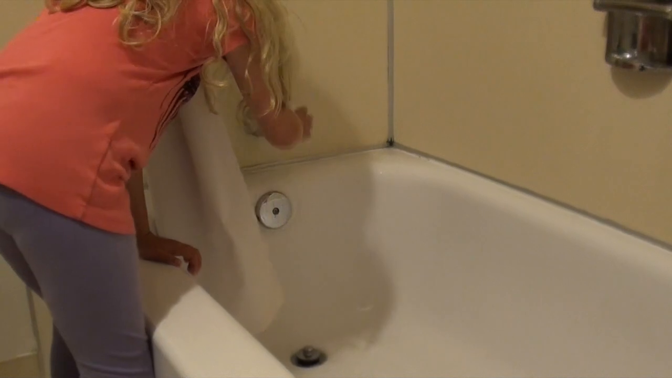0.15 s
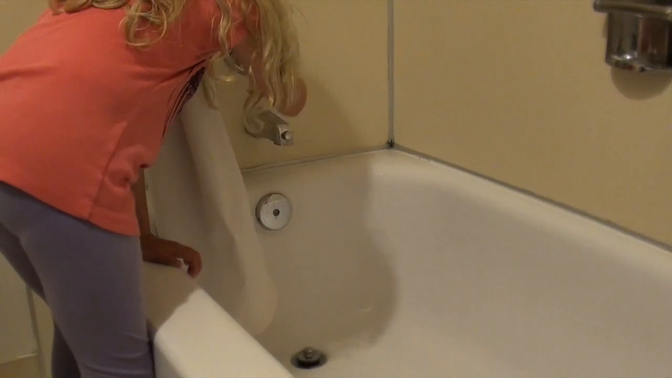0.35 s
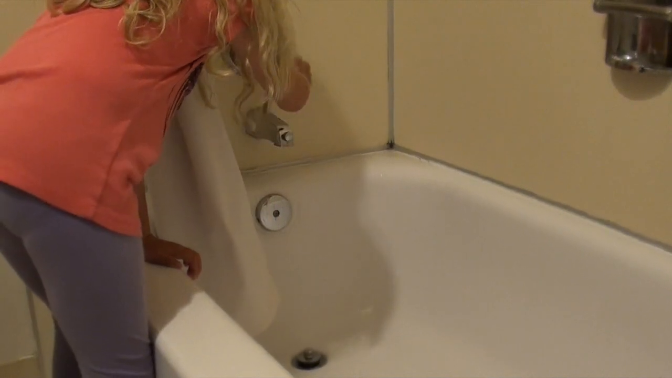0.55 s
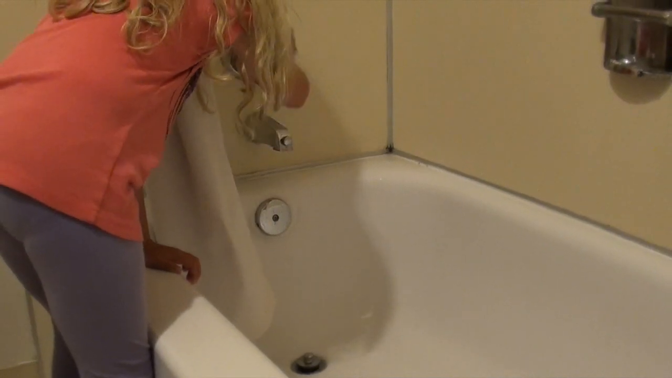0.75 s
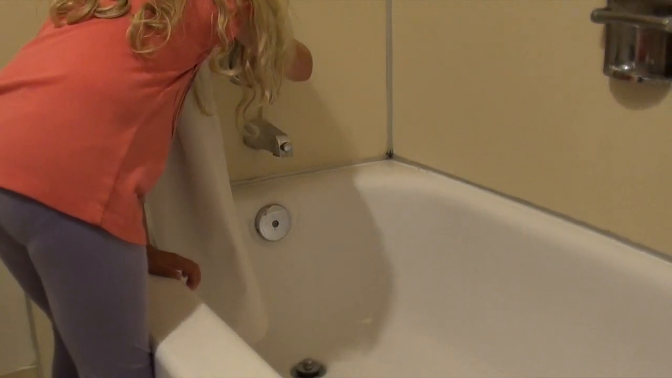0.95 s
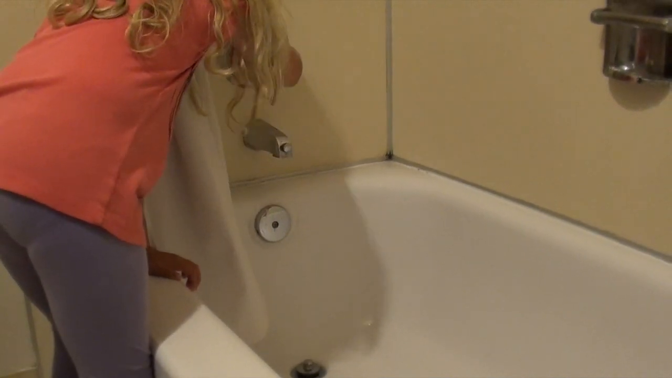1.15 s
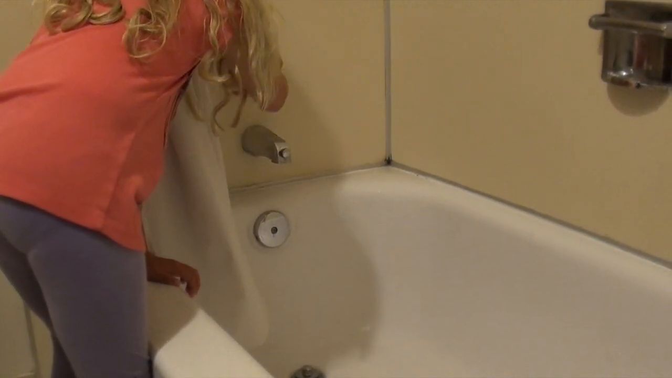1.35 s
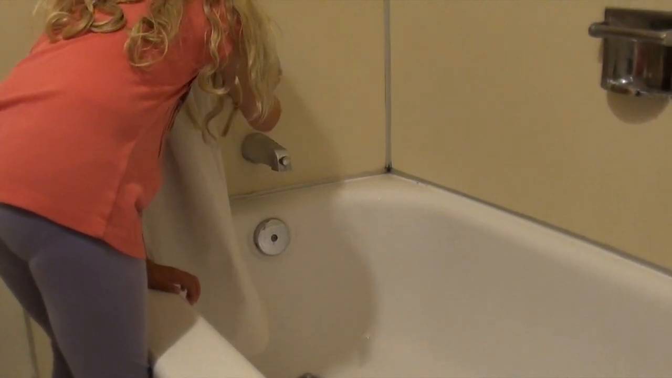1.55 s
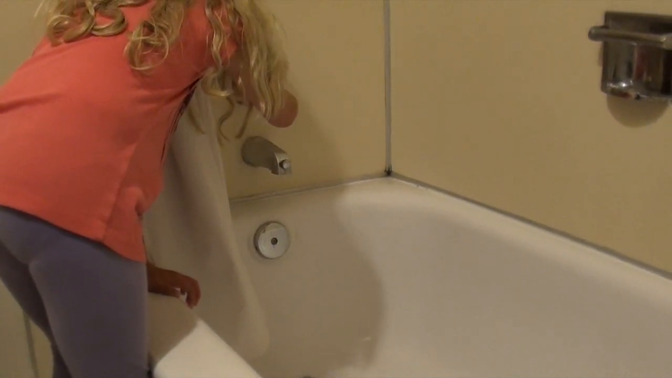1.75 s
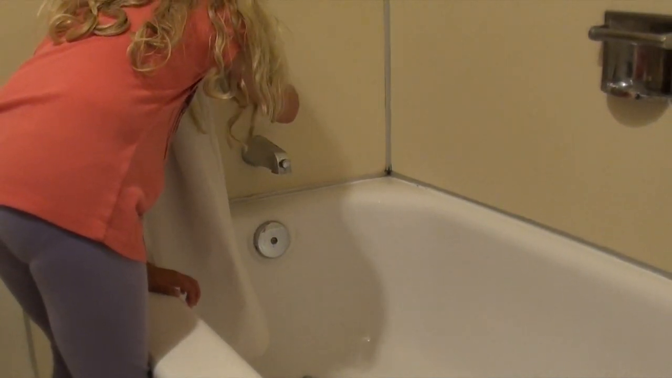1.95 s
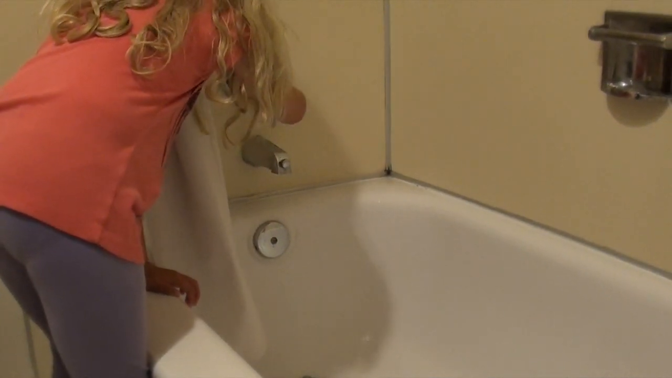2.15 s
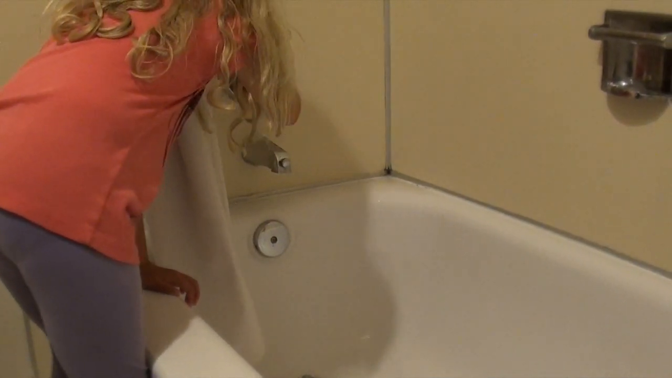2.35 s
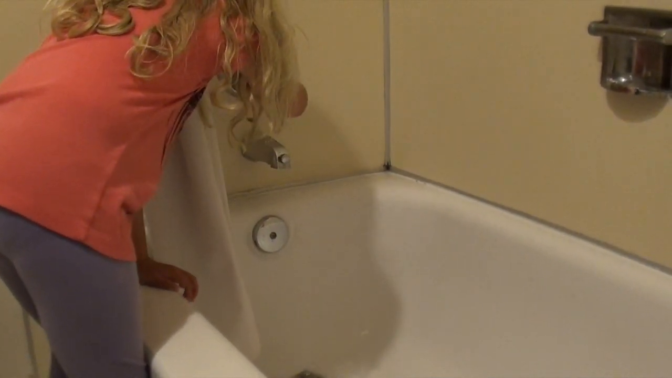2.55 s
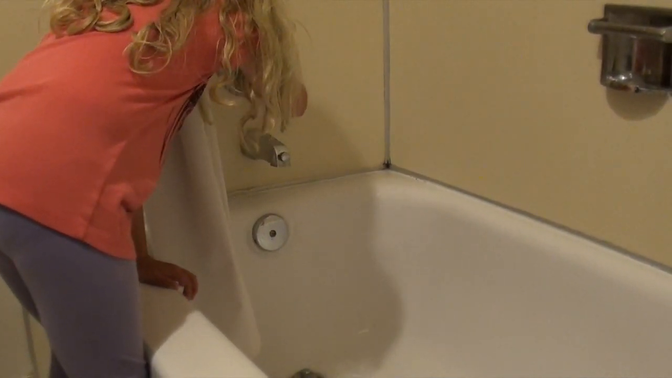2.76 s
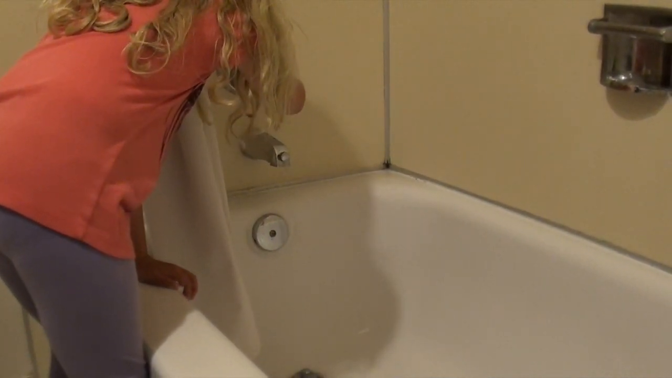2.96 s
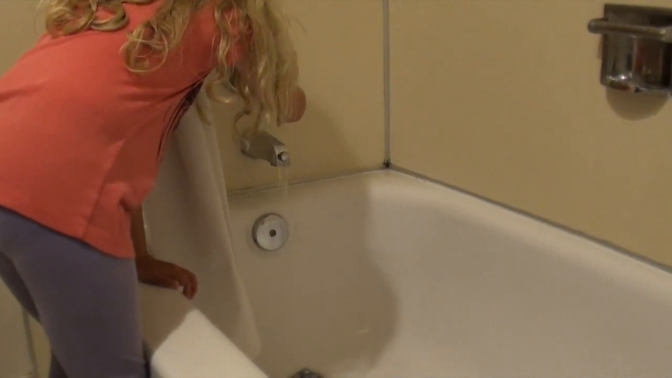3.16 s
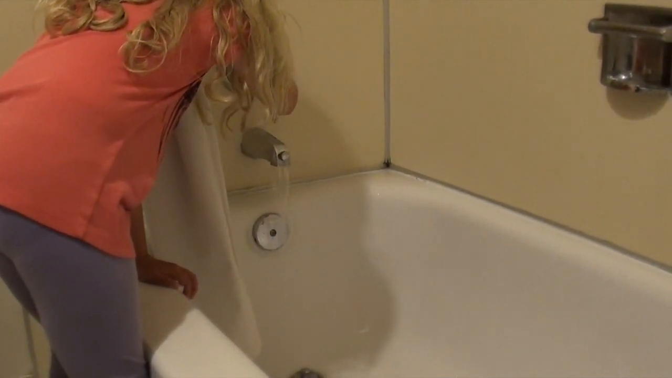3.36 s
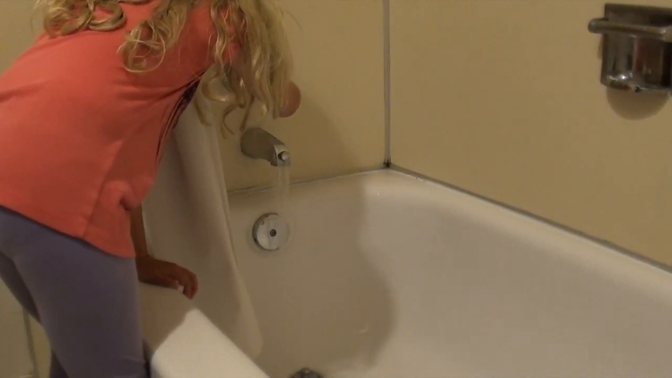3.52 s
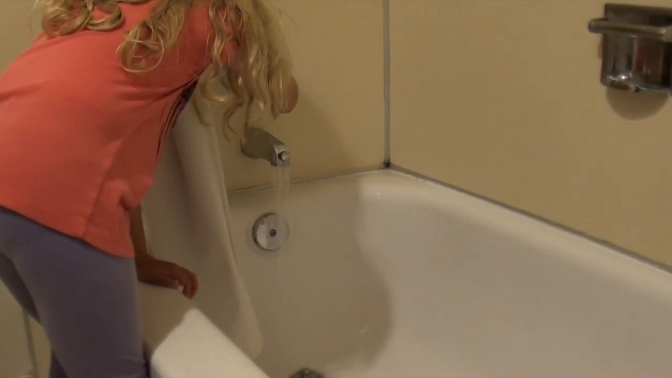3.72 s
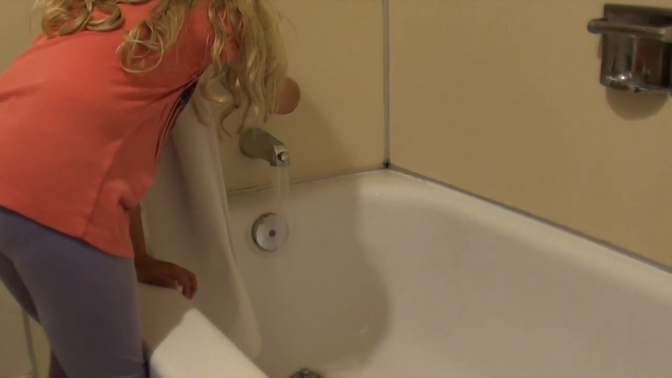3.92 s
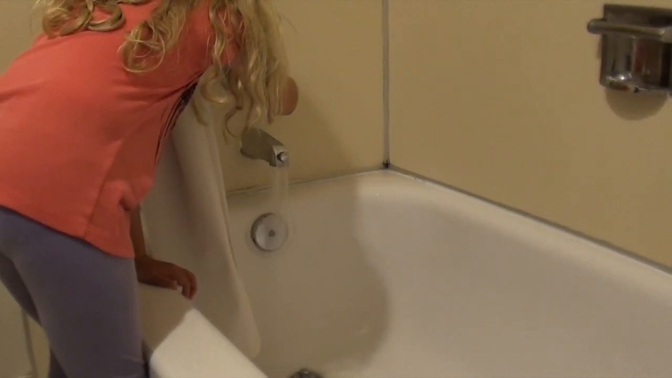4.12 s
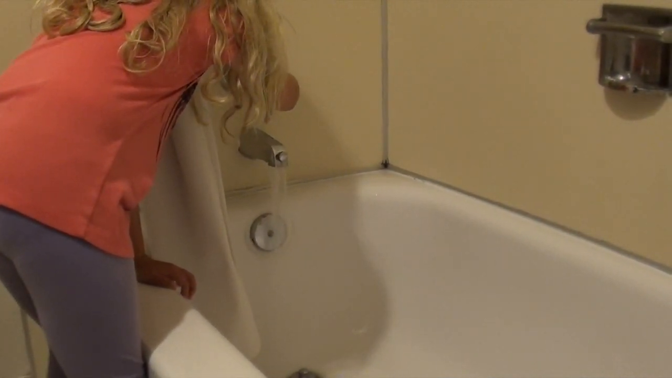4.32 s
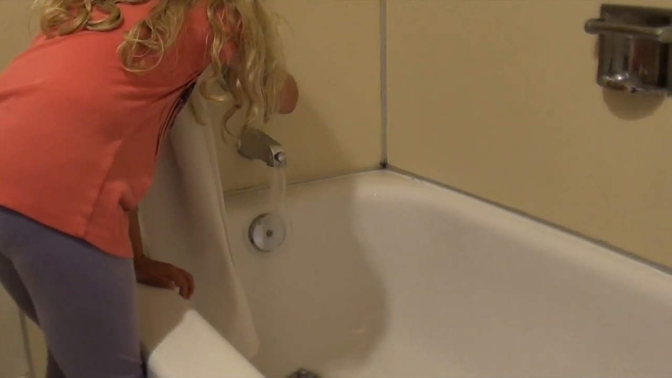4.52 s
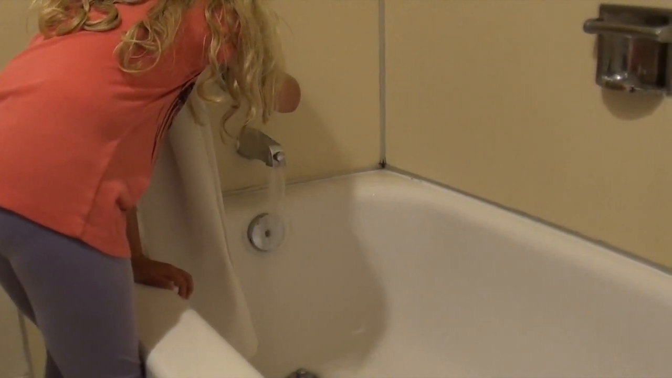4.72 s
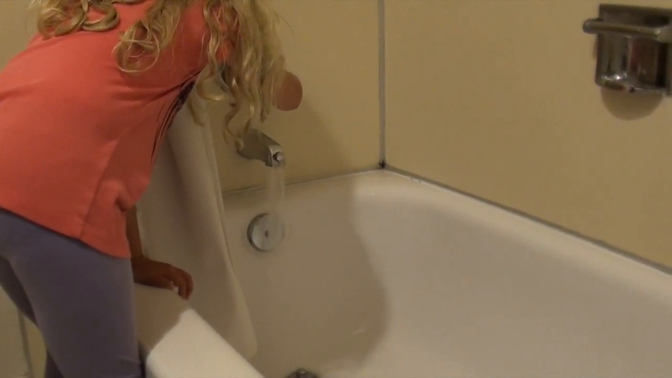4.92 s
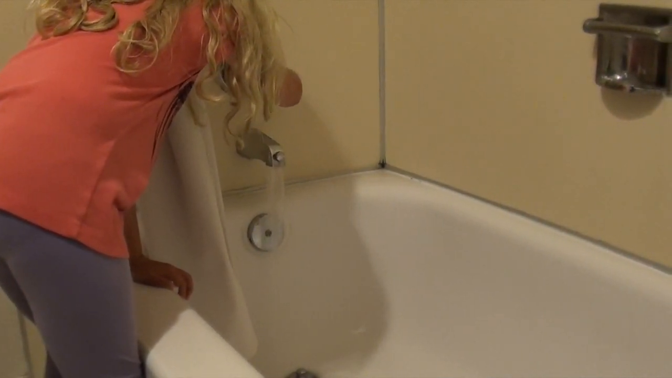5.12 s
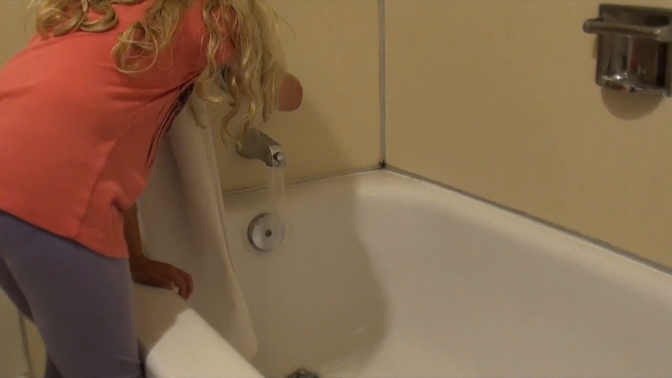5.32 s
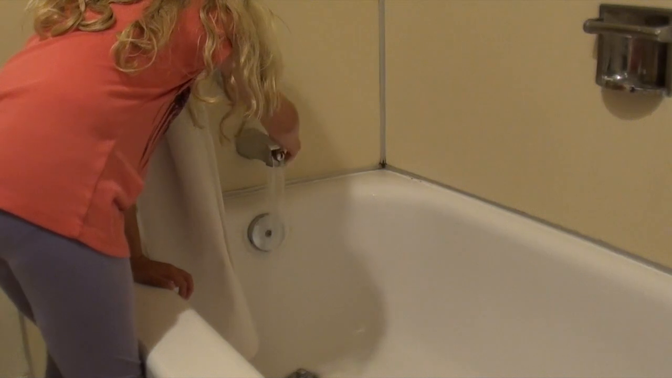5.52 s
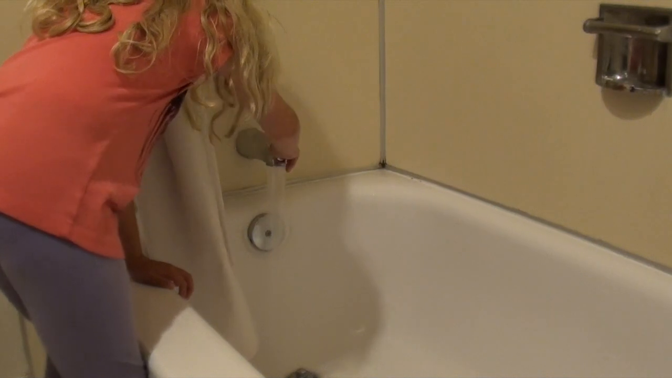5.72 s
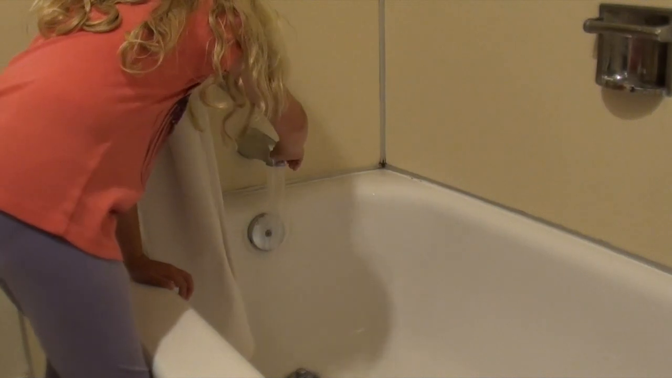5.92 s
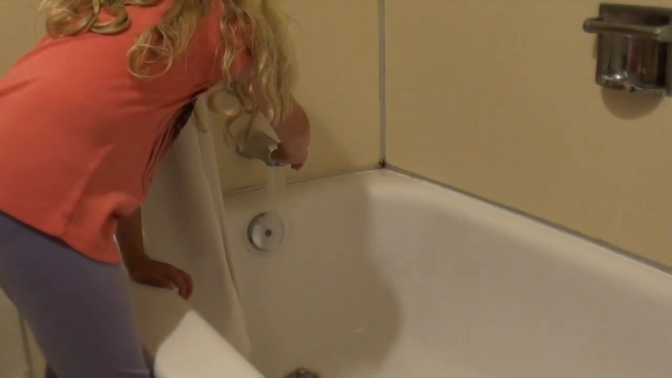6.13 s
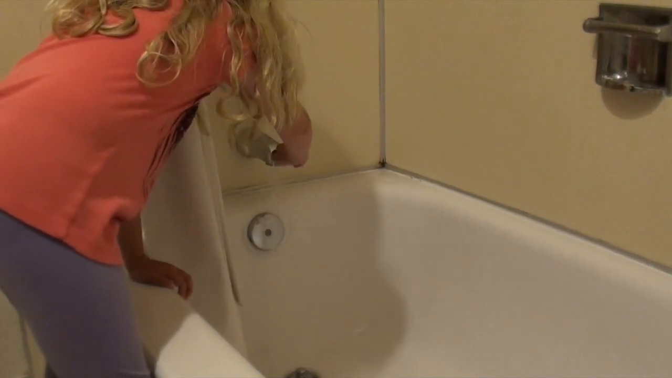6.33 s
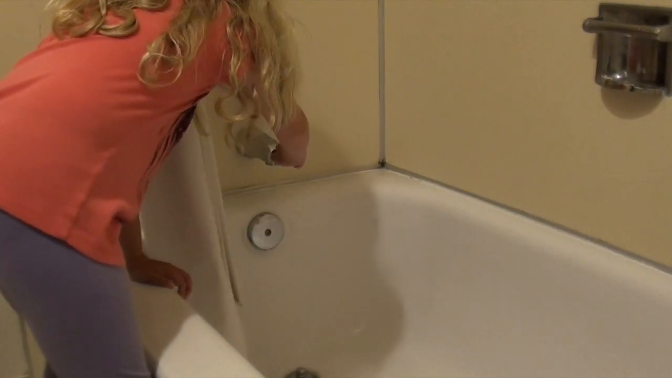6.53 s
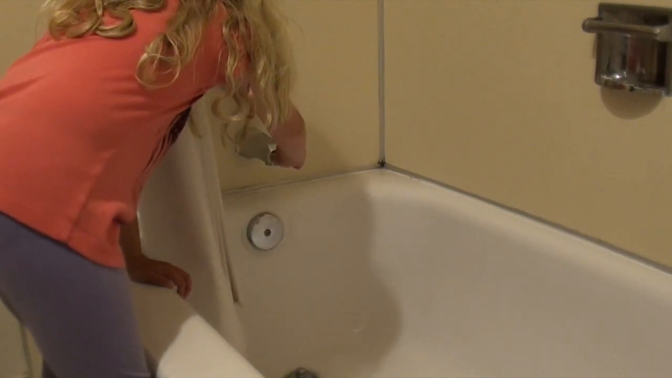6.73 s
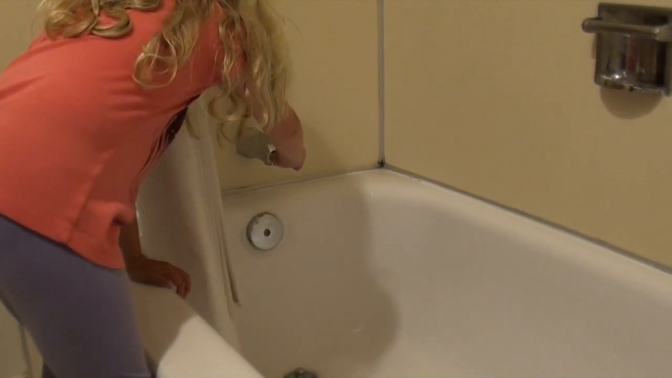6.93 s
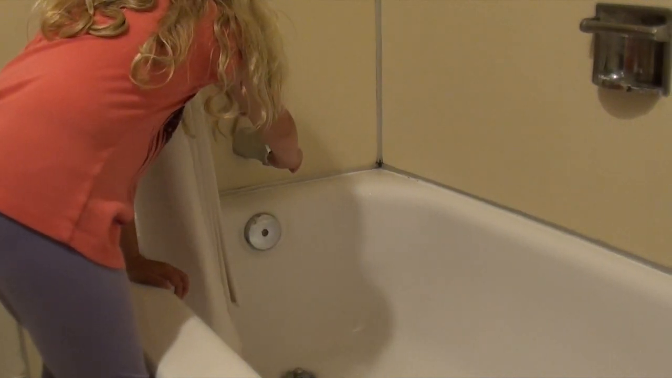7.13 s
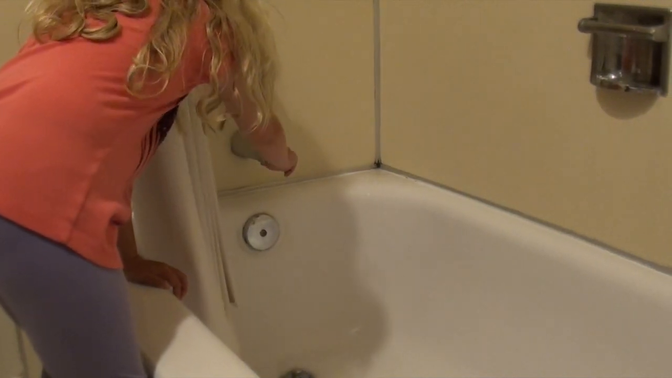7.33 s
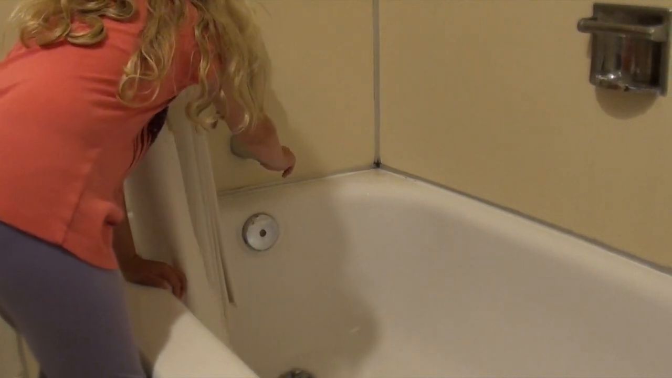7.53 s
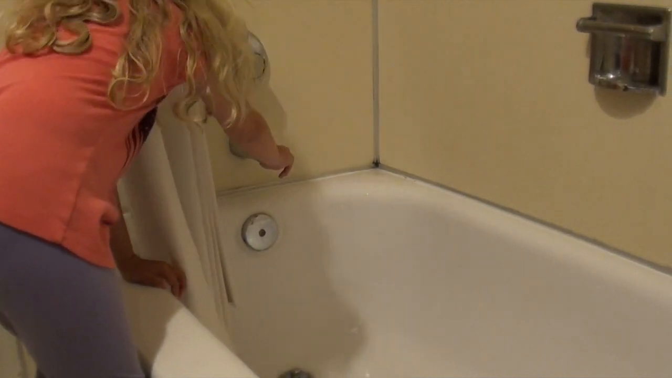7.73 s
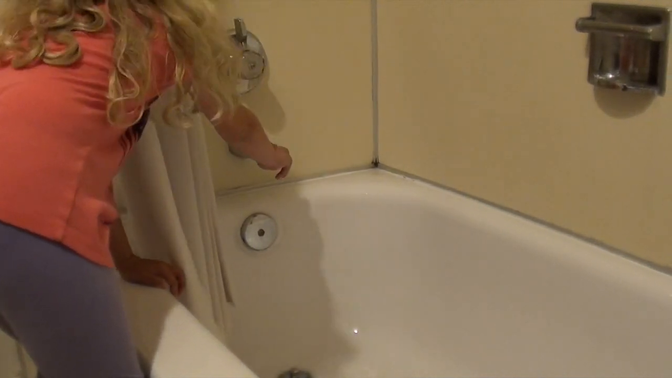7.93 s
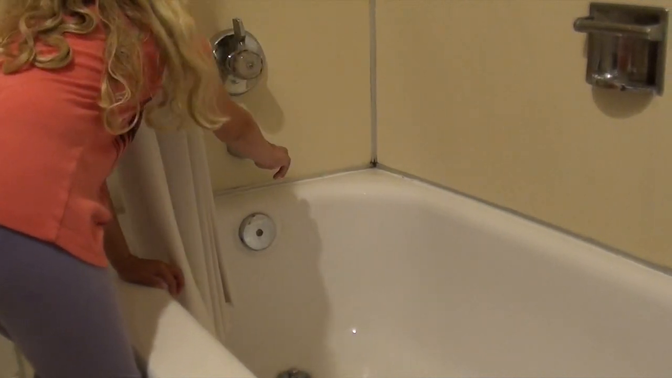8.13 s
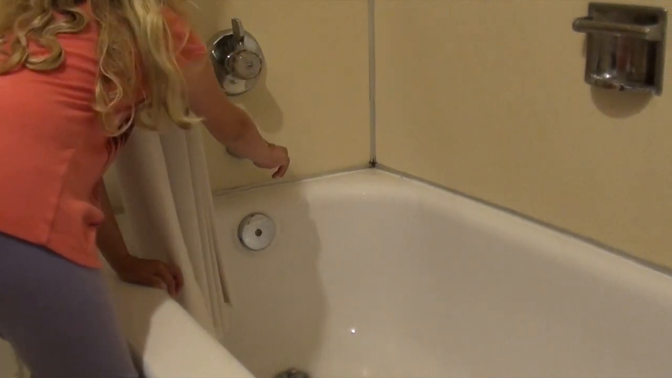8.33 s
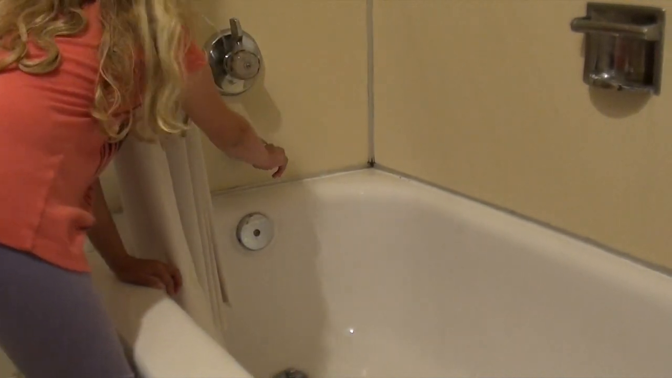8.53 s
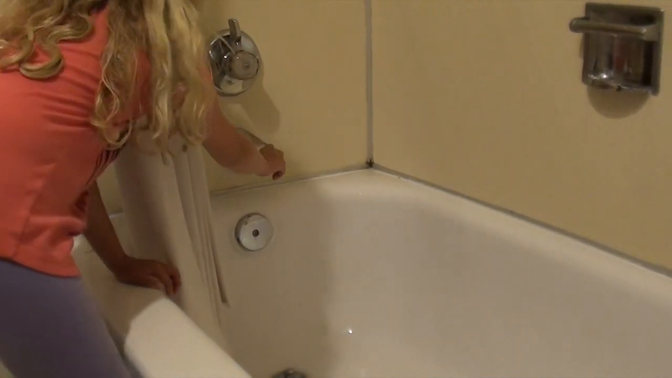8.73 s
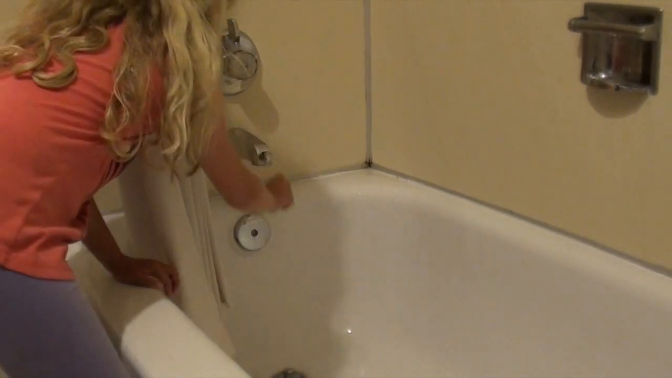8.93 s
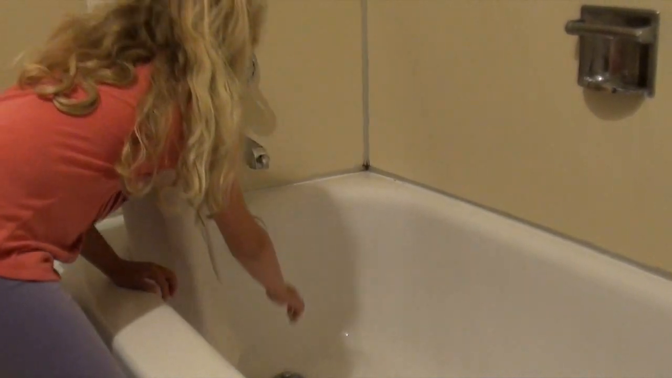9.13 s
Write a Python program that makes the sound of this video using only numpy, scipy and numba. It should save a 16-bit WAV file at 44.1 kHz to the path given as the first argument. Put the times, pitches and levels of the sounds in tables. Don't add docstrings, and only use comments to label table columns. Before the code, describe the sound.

Over a bathroom fan's hum, a stiff tap squeaks open, water hisses and gurgles into an empty tub, then a diverter thunks and a shower sprays.

```python
import sys
import numpy as np
from scipy import signal
from scipy.fft import rfft, irfft, next_fast_len
from scipy.io import wavfile
from scipy.ndimage import uniform_filter1d
from numba import njit

SR = 44100
rng = np.random.default_rng(int(sys.argv[2]) if len(sys.argv) > 2 else 0)


def volts_from_decibels(level):
    exponent = np.asarray(level, float) / 20
    return 10 ** exponent


def log_audio(samples):
    frames = np.atleast_2d(samples).T
    limited = np.clip(frames, -1, 1)
    pcm = np.round(limited * 32767).astype(np.int16)
    wavfile.write(sys.argv[1], SR, pcm)


N = 404397

# frequency in Hz, level in dB per Hz.
JET_SPECTRUM = [(2900, -17.5), (3400, -21), (4500, -20), (5600, -22), (7400, -5), (8700, 0.5),
                (10000, -6.5), (10900, -14), (11600, -16), (12400, -21), (13100, -16.5), (13600, -29),
                (15700, -47)]
# time in seconds, level in dB.
JET_LEVEL = [(2.63, -44), (2.71, -32.5), (2.96, -33.5), (3.08, -22), (3.34, -22), (3.38, -26), (3.55, -24),
             (3.63, -21.5), (4.04, -24), (4.58, -24), (5.7, -23), (6.46, -25), (6.53, -22.5), (6.63, -28.5),
             (7.39, -29.5), (7.48, -36), (7.49, -37)]
# peak time in seconds, lift in dB.
SURGES = [(3.19, 1.5), (3.44, 6.5), (3.6, -2), (3.74, 1), (4.11, -2), (4.5, 2), (4.82, 3), (5.19, 0),
          (5.71, -2), (5.82, 3), (6.07, 1.5), (6.24, 3.5), (6.32, 5.5), (6.39, 3)]
SURGE_RISE_FALL_DB_S = 101, 80
# frequency in Hz, width in Hz, level in dB.
SPOUT_MODES = [(7160, 210, 7.5), (6800, 3300, 3.5), (7500, 1040, 10.5)]
SPOUT_WETS_S, RING_DRY_DB, RING_WET_DB, RING_DIVERTED_DB = (3.04, 4.26), -15.5, 0.5, -6.5
# frequency in Hz, width in Hz, level in dB.
RISER_MODES = [(2190, 72, -9.5), (3900, 91, -10.5), (5000, 67, -11), (6060, 73, -3.5), (6500, 45, -4),
               (7230, 170, 0), (7400, 140, -7), (8880, 74, 5.5), (9350, 38, -2), (9900, 56, -1),
               (11000, 48, -12), (12300, 91, -11), (12700, 75, -13), (13100, 57, -15)]
# time in seconds, level in dB.
RISER_LEVEL = [(6.55, -27), (6.584, -24), (7.422, -25.5), (7.446, -31), (7.485, -24)]
# frequency in Hz, level in dB per Hz.
RISER_SPECTRUM = [(2500, -15), (3200, -18), (4000, -6.5), (4500, -5), (6000, -9.5), (9100, -6.5),
                  (13100, -12), (13500, -18), (15700, -26)]
# frequency in Hz, width in Hz, level in dB.
SEAT_MODES = [(2050, 190, -8.5), (4500, 160, -14), (5810, 29, -12), (7610, 84, -5), (7900, 58, -1),
              (8270, 66, 1), (8640, 160, -0.5), (9020, 25, -6), (9370, 100, -9), (9700, 57, -13),
              (11200, 28, -11), (13100, 95, -26)]
# time in seconds, level in dB, pitch ratio.
SEAT_LEVEL = [(2.63, -48, 1.34), (2.7, -33, 1.14), (2.8, -37, 1.0), (2.98, -35, 1), (3.1, -30, 1.0),
              (3.3, -42, 1.0)]
# start in seconds, hold in seconds, level in dB, pitch in Hz.
GLUGS = [(2.98, 0.12, -44, 2150), (3.186, 0.04, -30, 1980), (3.304, 0.0092, -27.5, 1760),
         (3.37, 0.036, -28, 2140), (3.505, .01, -25.5, 1900), (3.55, .02, -22, 1850),
         (3.59, 0.026, -20, 1720), (3.698, 0.0065, -25, 1930), (3.76, 0.0079, -30, 1960),
         (3.858, 0.06, -32, 1860), (3.96, 0.12, -35, 1630), (4.1, .1, -38, 1900)]
GLUG_RISE_FALL_DB_S = 240, 300
# start in seconds, hold in seconds, level in dB,
# pitch in Hz.
CHIRRS = [
    (4.11, .02, -40, 1220),
    (4.31, .05, -40, 1230),
    (4.42, 0.018, -39, 1200),
    (4.65, .05, -37, 1240),
    (4.78, .07, -37, 1290),
    (5.63, .05, -46, 1380),
    (5.79, .01, -43, 1600),
]
CHIRR_RISE_FALL_DB_S = 118, 90
BURBLE_DRY_DB, BURBLE_WET_DB = -12, -11
# time in seconds, level in dB.
STREAM_LEVEL = [(2.95, -54), (3.17, -48), (3.19, -27), (3.37, -39), (3.54, -31), (3.6, -30), (3.75, -25),
                (3.9, -25), (4.1, -26.5), (4.25, -25.5), (4.5, -26), (4.8, -24.5), (4.92, -28), (5.2, -24),
                (5.7, -26.5), (6.28, -28.5), (6.53, -25.5), (6.6, -36)]
MIST_DB, MIST_SHARE = -41.5, 1
# start in seconds, peak in dB, pitch in Hz, tail in seconds.
SLAPS = [(3.184, -17, 4270, 0.24), (3.184, -20, 2300, .2), (3.7117, -21, 3390, .15), (4.1, -21, 3900, .2),
         (4.98, -21, 4500, 0.11), (5.65, -23, 2200, 0.085), (3.45, -20, 5900, 0.26),
         (3.558, -19, 3100, 0.59), (3.565, -21, 3900, .5), (4.2, -21, 3720, .4), (3.645, -14, 5500, 0.24),
         (3.915, -18, 4860, 0.18), (4.555, -23.5, 1000, 0.17), (4.79, -18.5, 3320, 0.22),
         (4.79, -21, 2130, 0.2), (5.158, -12.5, 3600, 0.18), (5.28, -18, 4840, 0.19),
         (5.42, -16, 3950, 0.065), (6.299, -13.5, 4300, 0.08), (6.353, -15, 4080, 0.25),
         (6.36, -23, 2050, 0.15), (6.47, -19, 4300, .05), (7.45, -26, 1350, 0.14)]
WHISTLE_HZ = [1183, 1240]
# time in seconds, level in dB.
WHISTLE_LEVEL = [(4.98, -54), (5.1, -42), (5.45, -46), (5.65, -43), (5.78, -40), (5.85, -49), (5.95, -41),
                 (6.15, -50)]
# start in seconds, hold in seconds, level in dB.
DUMPS = [
    (3.2, 0.043, -34.5),
    (3.4, 0.13, -43),
    (3.62, 0.0095, -34),
    (4.33, 0.017, -31),
    (4.58, .03, -32.5),
    (6.37, 0.055, -31),
    (7.44, .02, -31.5),
]
DUMP_RISE_FALL_DB_S = 195, 112
# start in seconds, peak in dB, pitch in Hz.
BOOMS = [(3.175, -25, 500), (3.591, -26, 310), (4.56, -28, 830), (5.059, -33, 418), (6.032, -28, 536),
         (6.844, -32, 452), (7.143, -32, 444), (7.315, -25.5, 433), (7.803, -25.5, 409),
         (8.045, -22.5, 409), (8.119, -25, 454), (8.2, -25, 420), (8.305, -28, 480), (8.4, -28, 430),
         (8.638, -25, 453), (8.72, -26, 407), (8.88, -29, 460), (9.05, -27, 410)]
BOOM_T60_S = 0.1
# time in seconds, level in dB.
SPIT_LEVEL = [(7.48, -42), (7.52, -37), (7.58, -30), (7.66, -41), (7.8, -50)]
# time in seconds, level in dB.
SHOWER_LEVEL = [(7.475, -27), (7.493, -18), (7.649, -18.5), (7.827, -23), (7.903, -28), (7.975, -21.5),
                (8.055, -28), (8.6, -32), (9.17, -32)]
# start in seconds, peak in dB.
DROPS = [(7.4916, -10), (7.503, -11), (7.9116, -14), (7.9567, -10), (7.98, -11), (8.003, -15), (8.063, -17),
         (8.0974, -12), (8.106, -12), (8.13, -13), (8.2023, -13), (8.274, -12), (8.3329, -21),
         (8.3966, -18), (8.406, -17), (8.4172, -16), (8.482, -16), (8.535, -15), (8.55, -19), (8.6072, -20),
         (8.6252, -23), (8.6511, -23), (8.6965, -14), (8.72, -20), (8.7794, -20), (8.7943, -15),
         (8.81, -16), (8.8796, -19), (8.9075, -19), (9.0218, -20), (9.0447, -13), (9.0737, -18),
         (9.0871, -12), (9.1276, -22), (9.157, -14)]
# start in seconds, peak in dB, pitch in Hz, t60 in seconds.
SQUEAKS = [(7.455, -31, 2680, 0.11), (7.478, -25, 2790, .06), (7.586, -34, 2640, .08),
           (7.605, -32, 2690, .07), (7.725, -40, 2690, .12), (7.76, -40, 2680, .1), (7.79, -32, 2670, .07),
           (7.905, -33, 2690, .09), (7.935, -36, 2690, .12)]
DIVERTS_S, SPRAYS_S, POOLS_S = 6.33, 7.48, (8, 7.85)
# start in seconds, peak in dB.
THUNKS = [
    (6.349, -12),
    (6.363, -11),
    (6.383, -13),
    (6.394, -20),
    (6.534, -21),
]
# frequency in Hz, level in dB, t60 in seconds.
TUB_MODES = [(102, -8, 0.2), (147, 0.5, 0.18), (330, -11, .12), (375, 5, 0.1), (483, -1, .12),
             (885, 1, 0.12), (1200, -10, .05)]
# start in seconds, hold in seconds, ring in dB, low scrape in dB.
RUBS = [
    (1.588, .01, -47, -54),
    (1.601, 0.013, -42, -43),
    (1.692, .006, -32.5, -35),
    (2.08, 0.12, -43, -42),
    (2.527, 0.1, -42.5, -49),
]
GRIP_DB_S, SLIP_DB_S, SCRAPE_DB_S = 2500, 352, 200
# frequency in Hz, width in Hz, level in dB.
STEM_MODES = [(5170, 67, -9.5), (6540, 27, -12), (6930, 68, -3), (7020, 22, -1), (7520, 110, -6),
              (8900, 100, -10), (10430, 110, -9), (12000, 63, -22)]
# frequency in Hz, width in Hz, level in dB.
KNOB_MODES = [(854, 52, 1), (1370, 85, -8), (2100, 130, -6), (3500, 78, -18), (4350, 100, -17)]
# start in seconds, peak in dB, pitch in Hz, tail in seconds.
TICKS = [(.066, -35, 1100, .04), (.376, -36, 6500, .02), (.3815, -29.5, 3300, 0.033),
         (.5322, -25.5, 3460, 0.0049), (.8809, -20, 4250, 0.015), (1.1204, -30, 4000, .008),
         (1.3433, -37, 8500, 0.13), (1.5973, -38, 7500, .03), (1.685, -28, 8500, .03),
         (1.6926, -24, 6800, 0.057), (2.0802, -30, 7300, .04), (2.168, -30, 3400, .05),
         (2.168, -27, 845, 0.16), (2.5147, -38, 8000, .03)]
FAN_HZ = [50, 120, 150, 170.4, 240, 271.2]
FAN_LINES_DB = [-66.5, -46.5, -52, -49, -33.5, -46.5]
# frequency in Hz, level in dB per Hz. The second part is its total level in dB.
FAN_AIR, FAN_AIR_DB = [(18, -66), (30, -36), (66, -30), (108, -23.5), (187, -11.5), (213, -9), (243, -5),
                       (369, -17.5), (432, -10), (830, -18.5), (1110, -24), (1400, -23), (1720, -32),
                       (7260, -37.5), (15500, -47)], -38
# frequency in Hz, width in Hz, level in dB.
DUCT_MODES = [(293.4, 19, -1), (433, 10.2, 3.5), (570, 42, -14.5), (1386, 66, -11)]
# time in seconds, level in dB.
FAN_GAIN = [(0.0, -33.5), (2.6, -33.5), (3.9, -35), (7.33, -34.5), (7.6, -39.5), (7.81, -34), (9.17, -33.5)]
# frequency in Hz, level in dB.
SIDE_SPECTRUM = [(30, -17), (60, -35), (200, -12), (380, -20), (700, -11), (1290, -18), (2400, -14),
                 (4400, -22.5), (7500, -23), (9000, -21), (10000, -44), (15000, -38)]
# frequency in Hz, level in dB.
LEAN = [(250, -.4), (700, .8), (2400, .6), (5000, -.7), (8500, -.7), (10000, 0)]
ROOM_T60_S, ROOM_DB = 0.25, -6.5


def unit(x):
    return x / np.sqrt(np.mean(x ** 2))


def noise():
    return rng.standard_normal(N)


def colour(x, points, share=1):
    hz, db = np.transpose(points)
    size = next_fast_len(N)
    log_hz = np.log(np.arange(size // 2 + 1) * SR / size + 1)
    gain = volts_from_decibels(share * np.interp(log_hz, np.log(hz), db))
    return irfft(rfft(x, size) * gain, size)[:N]


def curves(rows):
    s, *columns = np.transpose(rows)
    t = np.arange(N) / SR
    runs_to_end = s[-1] > t[-1] - .02
    gate = np.clip(np.minimum(t - s[0], s[-1] - t + runs_to_end) / .015, 0, 1)
    return [gate] + [np.interp(t, s, c) for c in columns]


def ramp(span_s, *ends):
    return np.interp(np.arange(N) / SR, span_s, ends)


def swells(rows, rise_db_s, fall_db_s):
    t = np.arange(N) / SR
    levels = []
    for s, hold, db in rows:
        below_db = np.maximum(rise_db_s * (s - t), fall_db_s * (t - s - hold))
        levels.append(db - np.clip(below_db, 0, None))
    return np.max(levels, axis=0)


def walk(rate_hz):
    k = int(SR / rate_hz)
    held = np.repeat(rng.standard_normal(N // k + 1), k)
    return 1.3 * uniform_filter1d(uniform_filter1d(held, k), k)[:N]


@njit
def svf(x, hz, width):
    y, b, l = np.empty(len(x)), 0., 0.
    for i in range(len(x)):
        g, k = np.tan(np.pi * hz[i] / SR), width / hz[i]
        v = (b + g * (x[i] - l)) / (1 + g * (g + k))
        b, l, y[i] = 2 * v - b, l + 2 * g * v, k * v
    return y


def band(x, hz, width_hz):
    return svf(x, np.full(N, np.clip(1. * hz, 20, .45 * SR)), 1. * width_hz)


def ring(x, modes):
    return unit(sum((-1) ** k * volts_from_decibels(db) * band(x, hz, w) for k, (hz, w, db) in enumerate(modes)))


@njit
def grains(start, hz, t60, size, glide):
    out = np.zeros(N)
    for j in range(len(start)):
        n = int(t60[j] * SR) + 2
        z = size[j] + 0j
        p = np.exp(2j * np.pi * hz[j] / SR - np.log(1000) / n)
        turn = np.exp(2j * np.pi * hz[j] * (glide - 1) / SR / n)
        for i in range(start[j], min(start[j] + n, N)):
            out[i] += z.imag
            z *= p
            p *= turn
    return out


def droplets(count, lo_hz, hi_hz, cycles, spread_db, glide):
    when, pitch, big = rng.random((count, 3)).T
    hz = lo_hz * (hi_hz / lo_hz) ** pitch
    size = volts_from_decibels(-spread_db * np.log(big + .01))
    return unit(grains((when * N).astype(np.int64), hz, cycles / hz, size, glide))


def bursts(rows, width):
    out, t = np.zeros(N), np.arange(SR // 4) / SR
    for s, db, hz, tail in rows:
        i = int(s * SR)
        puff = rng.standard_normal(len(t)) * np.exp(-np.log(1000) * t / max(tail, .003))
        centre = np.full(len(t), 1. * hz)
        puff = svf(svf(puff, centre, width * hz), centre, 2 * width * hz)
        out[i:i + len(t)] += (volts_from_decibels(db) * puff / np.abs(puff).max())[:N - i]
    return out


def echo(x, t60_s):
    t = np.arange(SR // 2) / SR
    tail = rng.standard_normal(len(t)) * np.exp(-np.log(1000) * t / t60_s) * (t > .002)
    return signal.fftconvolve(x, tail / np.sqrt(np.sum(tail ** 2)))[:N]


def flow():
    gate, db = curves(JET_LEVEL)
    surge_db = swells([(s, 0, up) for s, up in SURGES], *SURGE_RISE_FALL_DB_S)
    return gate, db, np.maximum(surge_db, 0)


def valve():
    gate, db, surge_db = flow()
    ring_db = ramp(SPOUT_WETS_S, RING_DRY_DB, RING_WET_DB) + ramp((6.5, 6.65), 0, RING_DIVERTED_DB)
    jet = noise() * volts_from_decibels(1.35 * walk(200))
    hiss = volts_from_decibels(surge_db + 0.74 * walk(11)) * unit(colour(jet, JET_SPECTRUM))
    hiss += volts_from_decibels(ring_db + 1.33 * walk(9)) * ring(noise(), SPOUT_MODES)
    rising, riser_db = curves(RISER_LEVEL)
    riser = volts_from_decibels(-2.5) * ring(jet, [(hz, 1.8 * w, mode_db) for hz, w, mode_db in RISER_MODES])
    riser += volts_from_decibels(-10.5) * unit(colour(noise(), RISER_SPECTRUM))
    return gate * volts_from_decibels(db - 0.48) * hiss + rising * volts_from_decibels(riser_db) * riser


def seat():
    gate, db, ratio = curves(SEAT_LEVEL)
    jet = noise()
    song = sum((-1) ** k * volts_from_decibels(mode_db) * svf(jet, hz * ratio, 3.4 * w)
               for k, (hz, w, mode_db) in enumerate(SEAT_MODES))
    return gate * volts_from_decibels(db) * unit(song)


def pocket(rows, slopes_db_s, churn, width_hz, offset_db, flicker_db):
    db = swells([row[:3] for row in rows], *slopes_db_s)
    hz = curves(rows)[-1] * (1 + 0.018 * walk(9))
    tone = unit(svf(svf(churn, hz, width_hz), hz, 2 * width_hz))
    return volts_from_decibels(db + offset_db + flicker_db * walk(14)) * tone


def gurgle():
    churn = droplets(count=12000, lo_hz=880, hi_hz=2880, cycles=12.5, spread_db=0.5, glide=1.32)
    glugs = pocket(GLUGS, GLUG_RISE_FALL_DB_S, churn, 275.0, offset_db=-1.0, flicker_db=0.5)
    rough = churn + 3 * noise()
    chirrs = pocket(CHIRRS, CHIRR_RISE_FALL_DB_S, rough, 110.0, offset_db=-1.5, flicker_db=1.5)
    gate, db, surge_db = flow()
    burble = droplets(count=30000, lo_hz=1440, hi_hz=2880, cycles=10.1, spread_db=3.5, glide=1.98)
    burble += .5 * unit(svf(noise(), 2200 + 120 * walk(3.03), 150.0))
    burble_db = db + ramp((3.9, 4.2), BURBLE_DRY_DB, BURBLE_WET_DB) + 0.76 * surge_db + 2.6 * walk(7)
    return glugs + chirrs + gate * volts_from_decibels(burble_db) * burble


def stream():
    surge_db = flow()[2]
    gate, fizz_db = curves(STREAM_LEVEL)
    mist_db = MIST_DB + MIST_SHARE * (fizz_db + 26.5) + 0.51 * surge_db
    fizz = np.zeros(N)
    for hz in (3400, 4400, 5600):
        cloud = droplets(count=25000, lo_hz=0.86 * hz, hi_hz=2.0 * hz, cycles=13.0, spread_db=2.5, glide=0.61)
        fizz += volts_from_decibels(2.6 * walk(14)) * unit(band(cloud, hz, 1700))
    mist = unit(band(noise() * volts_from_decibels(2.2 * walk(60)), 9960, 3300))
    landing = volts_from_decibels(fizz_db - 10.0 + 0.39 * surge_db) * fizz + volts_from_decibels(mist_db + 10.0) * mist
    return gate * landing + bursts(SLAPS, width=0.21)


def whistle():
    gate, db = curves(WHISTLE_LEVEL)
    tones = sum(volts_from_decibels(2.5 * walk(12)) * unit(band(band(noise(), hz, 18), hz, 40)) for hz in WHISTLE_HZ)
    return gate * volts_from_decibels(db) * tones


def shower():
    gate, spray_db = curves(SHOWER_LEVEL)
    fine = droplets(count=60000, lo_hz=5140, hi_hz=14800, cycles=1.2, spread_db=-2.0, glide=1.)
    fine += 2.7 * noise()
    spray = unit(band(band(fine, 7520, 3400), 10340, 6900)) + volts_from_decibels(-21.0) * unit(band(fine, 11200, 4000))
    patter = volts_from_decibels(ramp(POOLS_S, -39.5, -38.0)) * unit(band(noise(), 3200, 2800))
    plops = droplets(count=30000, lo_hz=1000, hi_hz=2090, cycles=11.5, spread_db=-0.5, glide=2.5)
    patter += volts_from_decibels(ramp(POOLS_S, -41.0, -36.0)) * plops
    spatter = droplets(count=4000, lo_hz=7000, hi_hz=15000, cycles=3, spread_db=5.0, glide=1.)
    patter += volts_from_decibels(-35.5) * band(spatter, 12000, 9000)
    drops = bursts([(s, db, 9500, .003) for s, db in DROPS], width=1.2)
    drops += bursts([(s, db - 5, 9500, .06) for s, db in DROPS], width=0.4)
    spray_db = spray_db + 1.2 * walk(60) + 0.4 * walk(13)
    return gate * (volts_from_decibels(spray_db) * spray + patter) + drops


def squeaks():
    s, db, hz, t60_s = np.transpose(SQUEAKS)
    return grains((s * SR).astype(np.int64), hz, t60_s, volts_from_decibels(db), 1.05)


def tub():
    tap = ramp((2.95, 3.2), 0, 0.99) * ramp((SPRAYS_S, SPRAYS_S + 0.017), 0.99, 0)
    steady_db = ramp((3.85, 4.2), -43, -37) + 2.6 * walk(6)
    drum_db = np.maximum(steady_db, swells(DUMPS, *DUMP_RISE_FALL_DB_S))
    rumble_db = ramp((DIVERTS_S - .3, DIVERTS_S), -50.0, -48) + 3 * walk(7)
    pool = ramp((SPRAYS_S, SPRAYS_S + 0.1), 0, 0.91) * volts_from_decibels(ramp(POOLS_S, -38.0, -33.0) + 0.81 * walk(4))
    drum = droplets(count=30000, lo_hz=357, hi_hz=1310, cycles=7.8, spread_db=1.0, glide=1.5)
    rumble = unit(band(band(noise(), 140, 130), 126, 130))
    return (tap * volts_from_decibels(drum_db) + pool) * drum + tap * volts_from_decibels(rumble_db) * rumble


def booms():
    s, db, hz = np.transpose(BOOMS)
    notes = grains((s * SR).astype(np.int64), hz, np.full(len(s), BOOM_T60_S), volts_from_decibels(db), 1.07)
    gate, spit_db = curves(SPIT_LEVEL)
    return notes + gate * volts_from_decibels(spit_db) * unit(band(noise(), 2800, 2800))


def diverter():
    hz, mode_db, t60_s = np.tile(np.transpose(TUB_MODES), len(THUNKS))
    s, blow_db = np.repeat(np.transpose(THUNKS), len(TUB_MODES), axis=1)
    return -grains((s * SR).astype(np.int64), hz, t60_s, volts_from_decibels(mode_db + blow_db - 15.5), 0.94)


def handle():
    slips = noise() * volts_from_decibels(1.5 * walk(150))
    stem = ring(slips, STEM_MODES) + 0.56 * unit(band(band(slips, 8600, 5000), 8700, 6000))
    knob = ring(slips, KNOB_MODES) + 0.43 * unit(band(band(slips, 2500, 2500), 3100, 3000))
    ring_db = swells([row[:3] for row in RUBS], GRIP_DB_S, SLIP_DB_S)
    scrape_db = swells([(s, hold, db) for s, hold, _, db in RUBS], GRIP_DB_S, SCRAPE_DB_S)
    drowned = ramp((2.67, 2.69), 0.86, 0)
    return (volts_from_decibels(ring_db) * stem + volts_from_decibels(scrape_db) * knob) * drowned


def fan():
    t = np.arange(N) / SR
    hum = np.zeros(N)
    for hz, db in zip(FAN_HZ, FAN_LINES_DB):
        sine = np.sqrt(2) * np.sin(2 * np.pi * (hz * t + rng.random()))
        hum += volts_from_decibels(db + 0.69 * walk(5.8)) * sine
    air = volts_from_decibels(FAN_AIR_DB) * unit(colour(noise(), FAN_AIR)) + volts_from_decibels(-40) * ring(noise(), DUCT_MODES)
    gain = volts_from_decibels(curves(FAN_GAIN)[1] + 34)
    return hum * gain, air * gain


def scene():
    near = valve() + seat() + gurgle() + stream() + whistle() + shower() + squeaks()
    near += tub() + booms() + diverter() + handle()
    near = signal.sosfilt(signal.butter(6, 92, "high", fs=SR, output="sos"), near)
    hum, air = fan()
    mid = air + bursts(TICKS, width=1.0) + volts_from_decibels(0.5) * near + volts_from_decibels(ROOM_DB) * echo(near, ROOM_T60_S)
    side = colour(echo(mid, 0.058), SIDE_SPECTRUM)
    mid = mid + hum
    return np.array([colour(mid, LEAN, .5) + side, colour(mid, LEAN, -.5) - side])


def band_limit(x):
    return signal.sosfilt(signal.butter(12, 15740, fs=SR, output="sos"), x)


def record(dry):
    mix = np.tanh(0.91 * dry) / 0.87
    return band_limit(mix)


dry = scene()
out = record(dry)
log_audio(out)
```